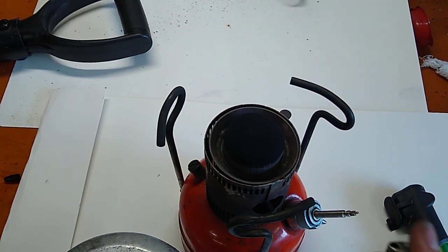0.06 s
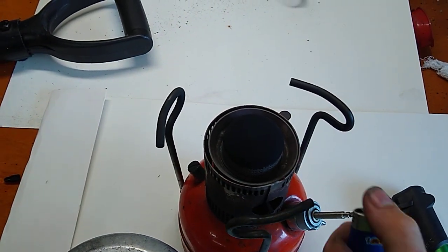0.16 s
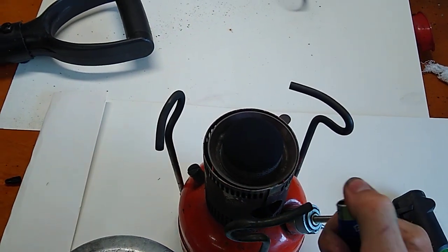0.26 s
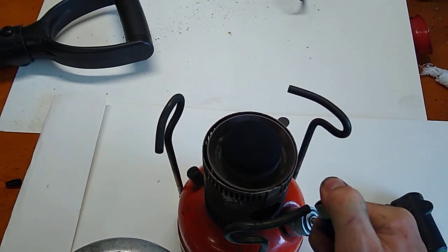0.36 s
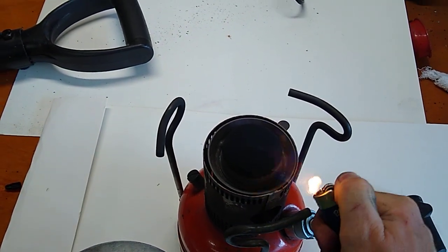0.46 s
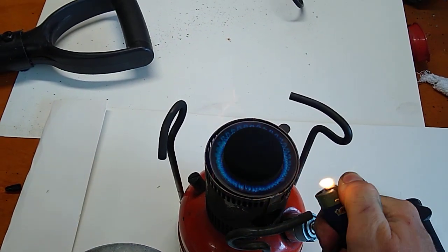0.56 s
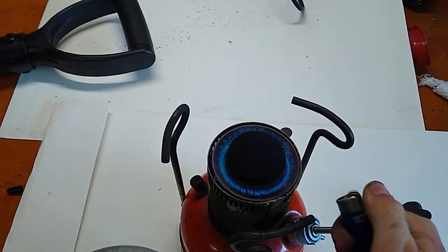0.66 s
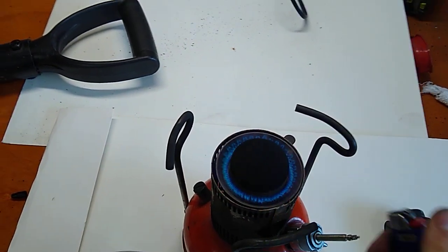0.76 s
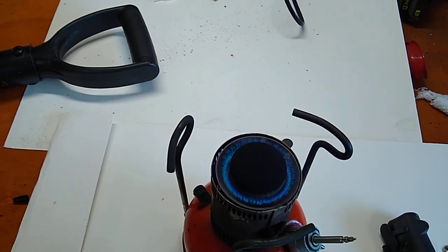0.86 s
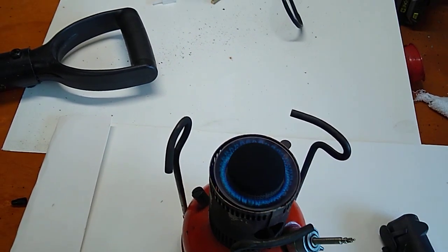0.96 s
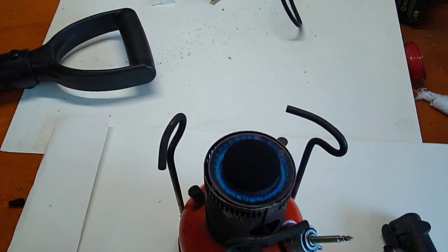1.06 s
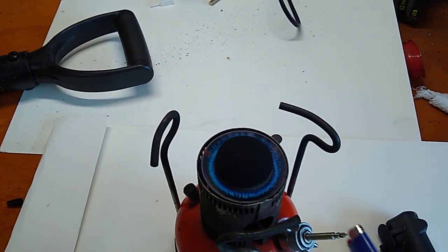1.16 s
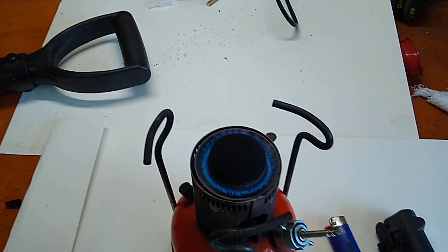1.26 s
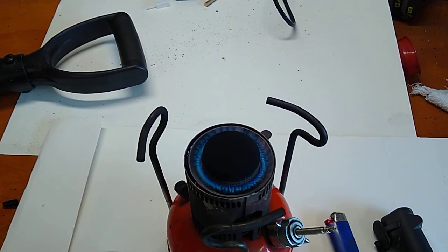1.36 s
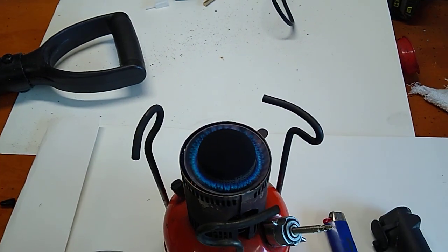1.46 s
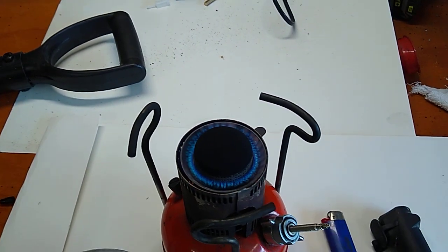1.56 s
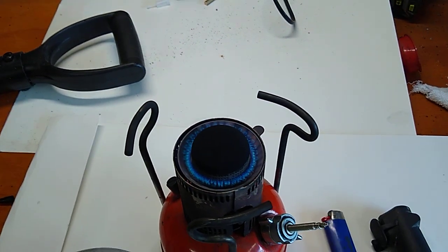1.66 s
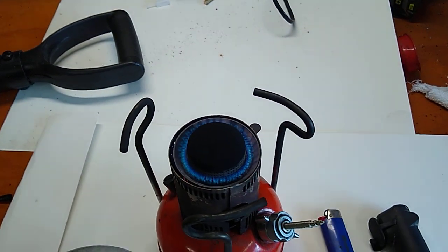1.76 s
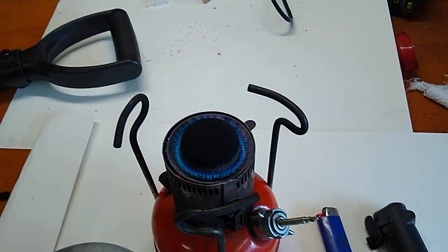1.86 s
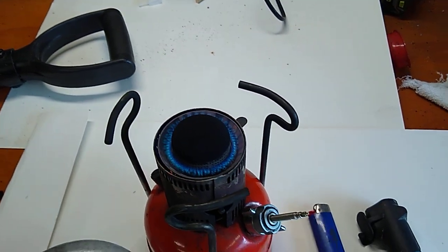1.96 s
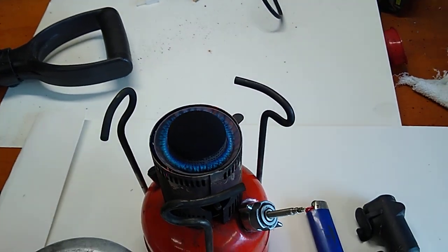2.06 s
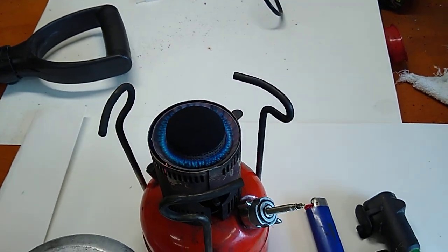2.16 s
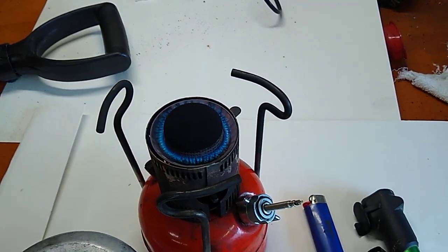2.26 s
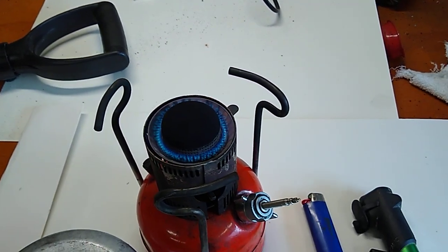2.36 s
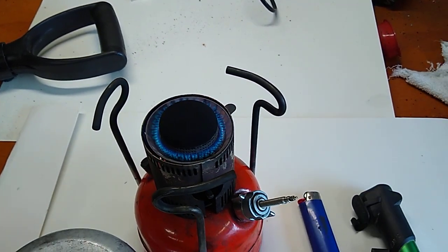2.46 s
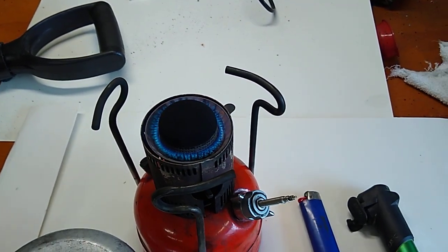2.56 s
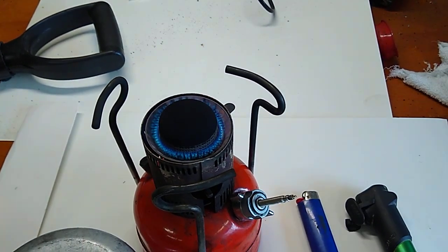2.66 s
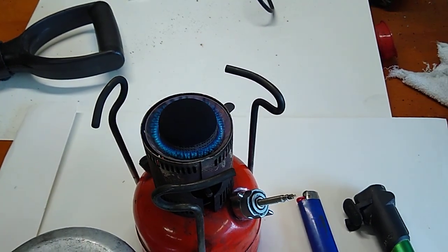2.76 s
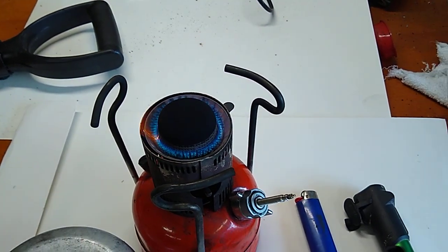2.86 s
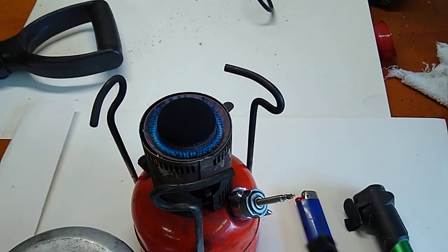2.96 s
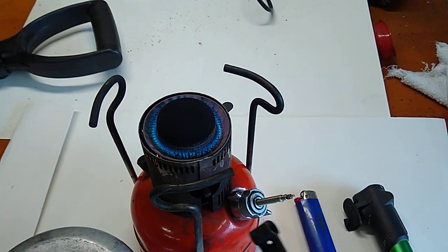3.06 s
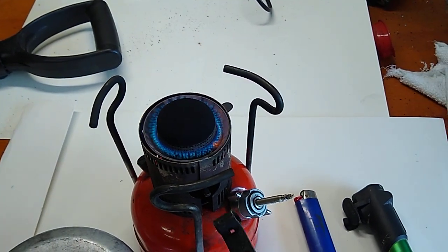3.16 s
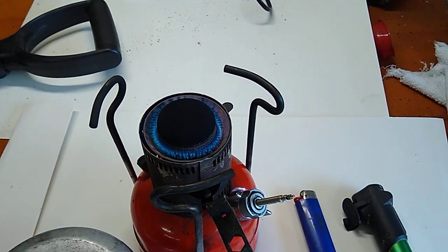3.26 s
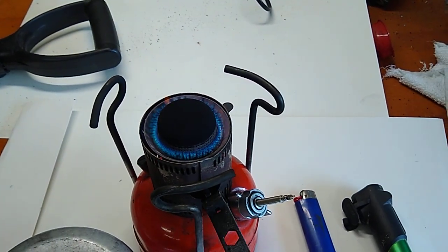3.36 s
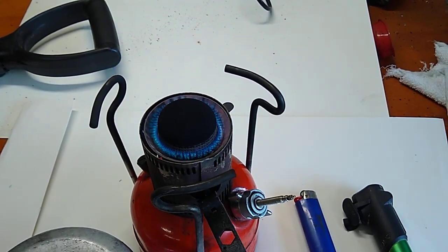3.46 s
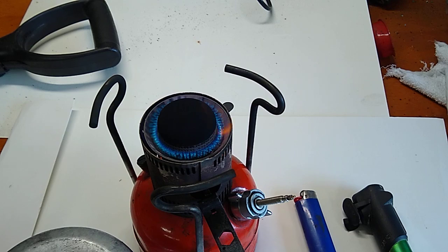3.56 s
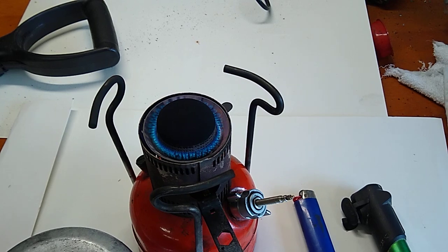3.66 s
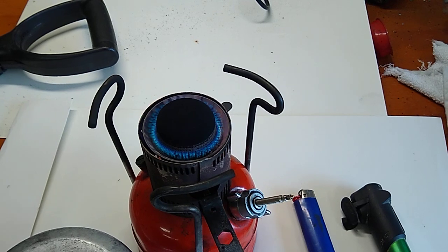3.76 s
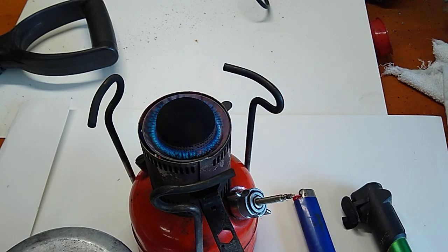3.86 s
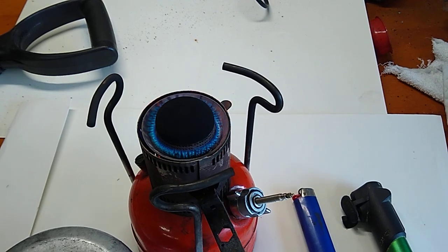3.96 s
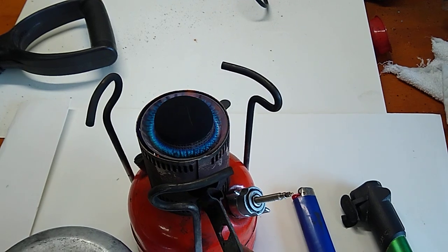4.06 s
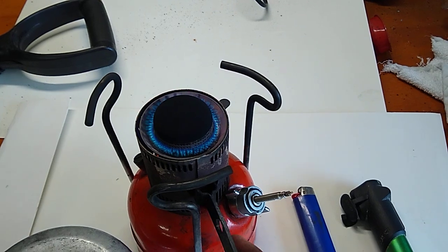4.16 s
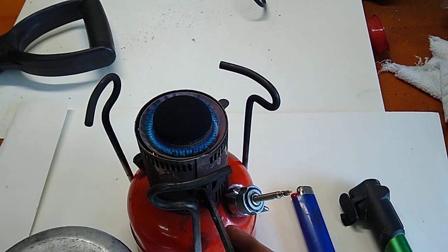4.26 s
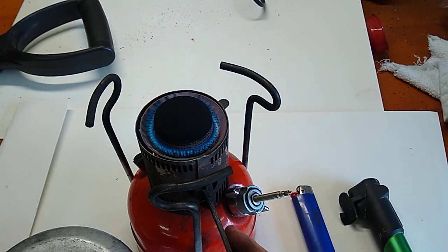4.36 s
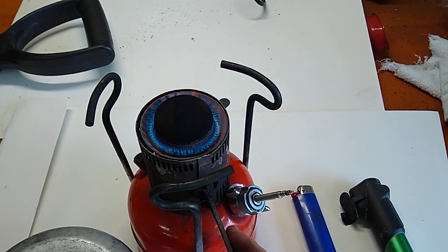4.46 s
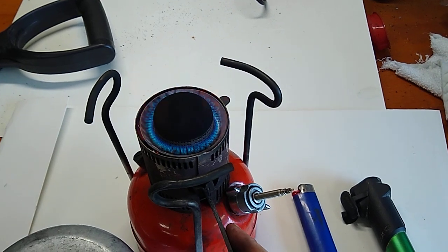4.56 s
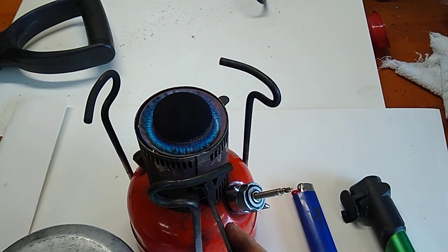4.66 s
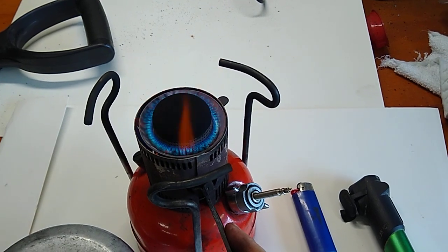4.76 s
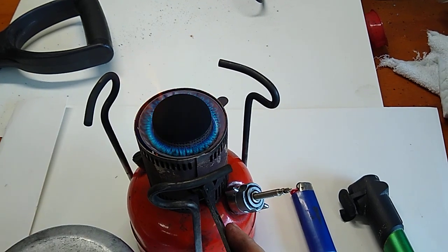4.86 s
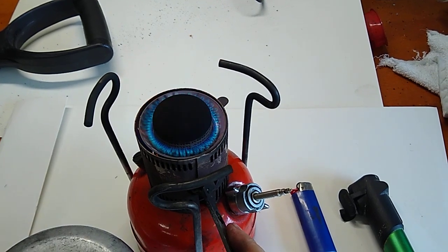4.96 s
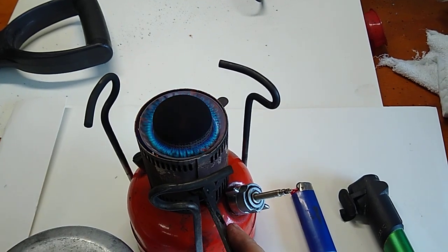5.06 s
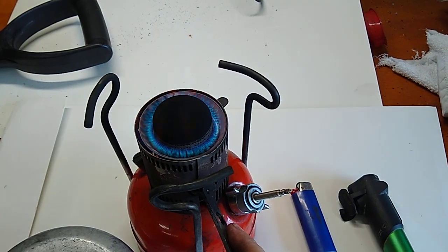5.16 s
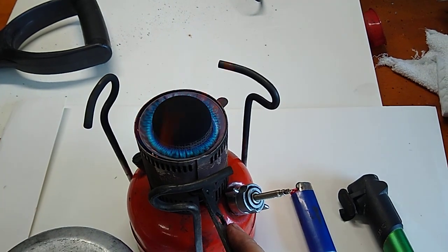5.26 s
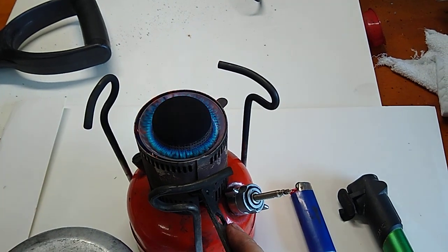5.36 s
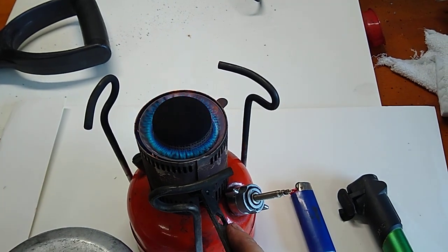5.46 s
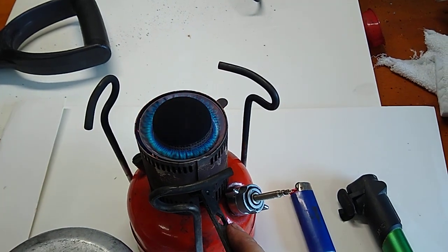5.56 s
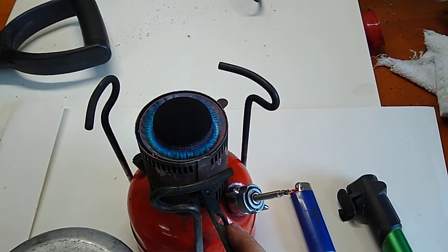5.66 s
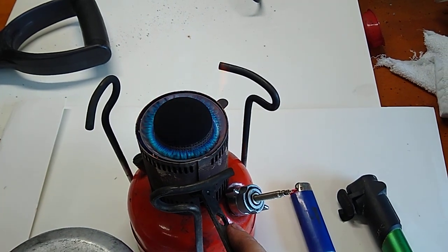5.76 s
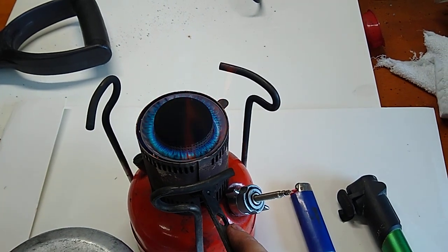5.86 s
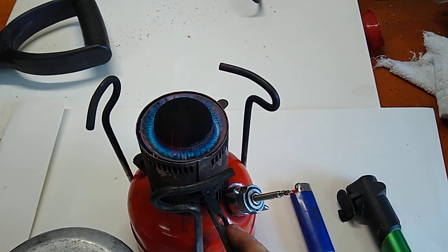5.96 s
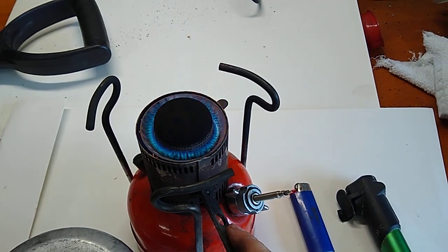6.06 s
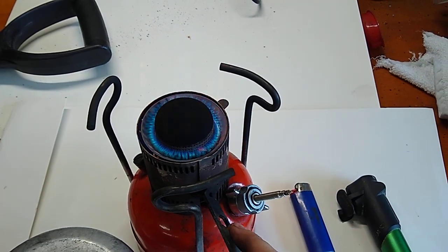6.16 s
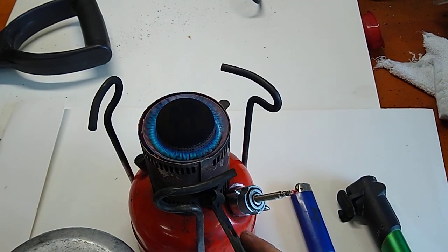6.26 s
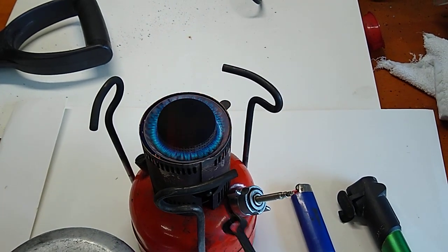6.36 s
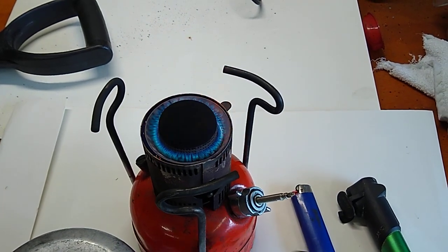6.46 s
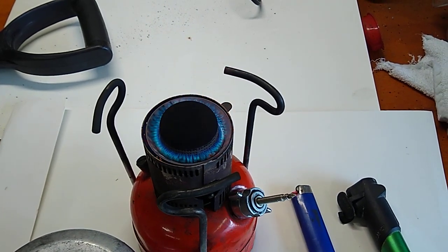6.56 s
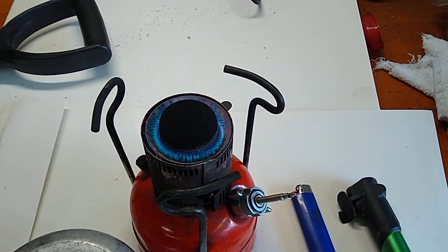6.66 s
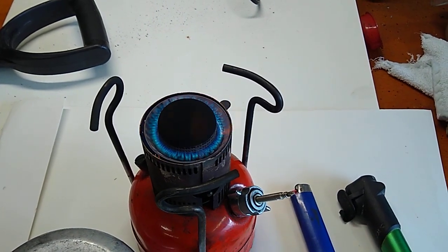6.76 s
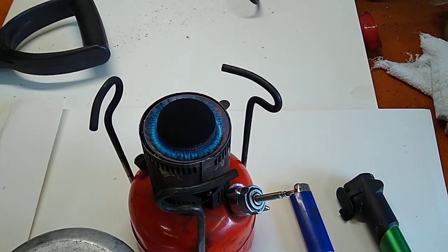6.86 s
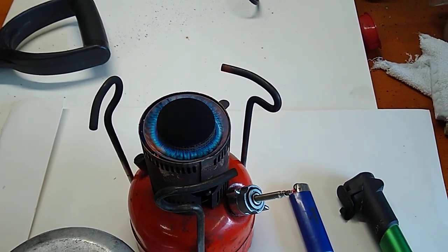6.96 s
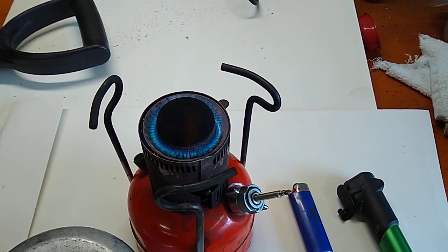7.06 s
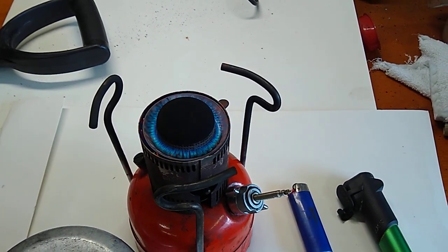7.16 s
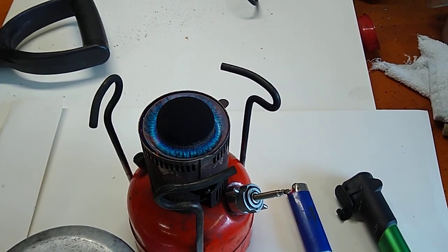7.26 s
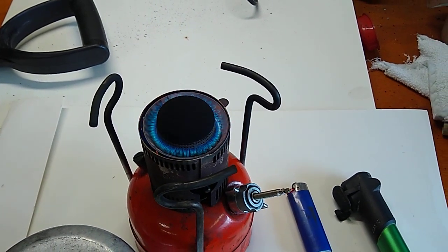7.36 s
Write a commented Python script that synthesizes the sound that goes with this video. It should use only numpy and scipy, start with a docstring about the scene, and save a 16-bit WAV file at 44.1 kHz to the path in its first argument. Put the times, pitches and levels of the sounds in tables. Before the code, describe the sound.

Close stereo sound in a small, lightly echoing workroom. From 0 s a thin, quiet vapour hiss, with a barely audible distant engine hum that climbs in pitch and fades by about 4.5 s. At 0.46 s a crisp, gritty flint snap; at 0.54 s the burner catches with a very short low woof and tiny pops, one more at 0.85 s. A soft, steady roar with airy jet hiss continues. From 1.06 to 1.24 s a lighter clacks down in a rapid cluster of hard bright clicks and woody bench knocks. Treble opens slightly as the microphones turn. Clicks at 1.93 s, knocks and ticks from 2.25 to 2.6 s, small metallic ticks at 3.83 s, a faint one at 4.3 s. Around 4.55 s the valve opens: the flame abruptly grows louder and raspier, slightly more by 5.2 s, then holds. A sharp click at 6.72 s, a strong clack and knock at 6.92 s; the roar continues to 7.4 s.

```python
"""Petrol stove lit on a workbench

Vapour hisses from the jet, a lighter is struck, the ring catches with a woof and roars; the valve is
opened later. Flame and jet are noise of set spectra, the ignition is noise bursts and gliding tones.
A lighter and a valve key click (short rings with noise) and knock (decaying bench modes).
A far engine hums upward as a few sines; a hand-held pair of microphones turns a little.
"""
import sys
import numpy as np
from scipy import signal
from scipy.fft import rfft, irfft
from scipy.io import wavfile
from scipy.ndimage import uniform_filter1d

SR = 44100
rng = np.random.default_rng(int(sys.argv[2]) if len(sys.argv) > 2 else 0)


def to_wav(s):
    """Save 16-bit WAV."""
    ch = np.atleast_2d(s).T  # columns
    pcm = np.round(np.clip(ch, -1, 1) * 32767)  # PCM
    wavfile.write(sys.argv[1], SR, pcm.astype(np.int16))


def decibels_to_gain(level_db):
    """Convert a level in decibels to a linear amplitude gain (20 dB per decade)."""
    exponent = np.asarray(level_db, float) / 20
    return 10 ** exponent


N = 326781

# Partials of the engine. Each row: order in quarters of the firing tone, level in dB.
ENGINE_ORDERS = [(2, -12), (4, 0), (6, -9)]
# Firing tone: climbs evenly after a lag that dies away.
ENGINE_HZ, ENGINE_CLIMB_HZ_PER_S, ENGINE_LAG_HZ, ENGINE_LAG_S = 77.7, 5, 12, 0.52
ENGINE_DB, ENGINE_RISE_S, ENGINE_FADE_DB_PER_S, ENGINE_GONE_S = -57.5, 0.38, 2.5, 4.3

# Room rumble spectrum. Each row: frequency in Hz, relative density in dB per Hz.
RUMBLE_SPECTRUM = [(30, -32), (65, -10), (110, -1), (140, -24), (480, -26), (900, -25), (1500, -60)]
RUMBLE_DB = -63.5
# Decay of the room. Each row: frequency in Hz, t60 in seconds.
ROOM_DECAY = [(300, 0.29), (2000, 0.29), (8000, 0.18)]
STRUCK_ROOM_DB, BURNER_ROOM_DB = -8, -13.5
# Coherence of the two microphones. Each row: frequency in Hz, left-right likeness (1 = alike).
LIKENESS = [(60, 0.95), (300, 1), (480, 0.67), (740, 0.99), (1290, 0.8), (2100, 0.35), (3400, 0.7),
            (5600, .95), (6300, .5), (7100, .8), (7800, .5), (8900, .88), (9700, .4), (11950, .8),
            (12700, .2), (15500, .6)]

# Knocks on the bench. Each row: time in seconds, level in dB, brightness in dB per octave.
KNOCKS = [(1.077, -21, 0.5), (1.084, -22, 14), (1.136, -28.5, 6), (1.232, -32, 3), (2.248, -21, 3.5),
          (2.267, -33, 3), (2.399, -23, 4.5), (2.417, -37, 3), (2.58, -31.5, -3.5), (6.9202, -16.5, 2),
          (6.947, -26, 9), (6.959, -24.5, 4)]
# Modes of the bench top. Each row: frequency in Hz, level in dB, t60 in seconds.
BENCH_MODES = [(147, -8.5, 0.19), (212, -12.5, 0.13), (254.5, -13, 0.18), (364, -5, 0.11),
               (441, -6.5, 0.059), (550, -6.5, 0.039), (626, -1, 0.03), (806, -5.5, 0.056), (858, -9, 0.12),
               (1010, 1, 0.012), (1164, -12, 0.069), (1276, -23.5, 0.088), (1510, -6.5, 0.019),
               (1800, -8.5, 0.0045), (2200, -12, 0.029)]
# Scuff of the contact. Each row: frequency in Hz, relative density in dB per Hz.
CONTACT_SPECTRUM = [(500, -44), (1200, -6), (2000, -3), (3000, 6), (5000, -20)]
CONTACT_DB, CONTACT_T60_S, RATTLE_S = -9, 0.056, 0.0098

# Hard clicks of plastic and steel. Each row: time in seconds, ring level in dB, ring pitch in Hz,
# ring t60 in seconds, crack level beside the ring in dB.
CLICKS = [(1.0623, -7.5, 5120, 0.026, -8.5), (1.075, -16, 7850, 0.0086, 0.5), (1.075, -16, 3000, 0.0098, 3),
          (1.097, -23, 2390, .012, 3), (1.089, -17, 9300, .0077, -2), (1.126, -27, 8000, .005, 1),
          (1.13, -14.5, 5100, 0.019, -9.5), (1.1385, -15.5, 9600, 0.016, -4.5),
          (1.141, -23, 3450, .012, -3), (1.2313, -3.5, 9250, 0.0046, -15.5), (1.236, -7, 7300, 0.0066, -27),
          (1.932, -16.5, 9300, .008, 0), (1.9341, -12, 9000, 0.0081, 0),
          (1.9362, -18.5, 2780, 0.0024, -0.5), (2.247, -24, 6950, 0.0055, -1),
          (2.282, -26, 6030, .0058, -11), (2.415, -11, 7800, 0.0062, -16), (2.578, -23, 7540, 0.012, -8),
          (2.621, -24, 7500, 0.0075, -10), (3.8297, -29, 3970, 0.067, 1), (3.8368, -19.5, 4700, 0.011, -10),
          (3.837, -21, 9200, 0.0087, -10), (3.8435, -26, 4850, .023, -15), (4.311, -36, 3630, .0098, 5),
          (6.7246, -11.5, 5500, 0.0087, -5), (6.858, -27, 5300, .05, -15), (6.92, -17, 7760, .008, -3),
          (6.948, -16.5, 7750, 0.016, -4), (6.9474, -14, 1860, 0.0067, 0)]
# Crack spectrum. Each row: multiple of the ring pitch, relative density in dB per Hz.
CRACK_SPECTRUM = [(.2, -30), (.45, -1), (.75, -1), (1.1, 6), (1.7, -8), (3, -11), (5, -31)]
CLICK_RISE_S, CRACK_T60_S = 0.0005, 0.015
CHATTER_DB, CHATTER_T60_S, CHATTER_PER_S = -5.5, 0.065, 1200  # loose parts after each click

# Flint and woof spectra. Each row: frequency in Hz, relative density in dB per Hz.
SPARK_SPECTRUM = [(350, -72), (600, -15), (846, -16), (4160, -3), (5710, -18), (7310, 1.5), (16000, -12)]
WOOF_SPECTRUM = [(21, -36), (35, 8.5), (328, -7.5), (505, -15), (1120, -7.5), (1690, -18), (6000, -28),
                 (7800, -73)]
# Vapour pockets that pop. Each row: start in seconds, level in dB, start Hz, end Hz, length in ms.
POPS = [(.535, -31, 69, 68, 49), (.544, -19.5, 353, 287, 15), (0.852, -30.5, 176, 105, 17.4)]
FLINT_AT_S, FLINT_DB, FLINT_HOLD_S = 0.4565, -17.5, 0.0015
FLINT_RISE_DB_PER_S, FLINT_FALL_DB_PER_S = 4000, 3500
WOOF_AT_S, WOOF_DB, WOOF_HOLD_S = 0.542, -24.5, 0.0079
WOOF_RISE_DB_PER_S, WOOF_FALL_DB_PER_S = 1500, 1800

# Lit flame, unlit vapour in the burner cap, jet. Each row: frequency in Hz, relative density in dB per Hz.
ROAR_SPECTRUM = [(35, -40), (70, -35), (100, 8), (160, -14.5), (260, 3.5), (400, -4.5), (660, 0.5),
                 (1000, 0.5), (1700, -3.5), (2500, -14.5), (3500, -55)]
RASP_SPECTRUM = [(500, -11.5), (800, -6.5), (950, -5), (1300, -11.5), (1650, -3), (2100, -4), (2560, -3),
                 (3000, -12.5), (3500, -11), (4400, -14), (5500, -53)]
COLD_SPECTRUM = [(290, -74), (500, -57), (1200, -13), (1510, -6), (1760, -15), (2000, -10.5), (3140, -22.5),
                 (4500, -12), (5850, -12.5), (9900, -51)]
HISS_SPECTRUM = [(2500, -21.5), (3500, -19), (6500, -15.5), (8200, -10.5), (10200, -18.5), (11000, -13.5),
                 (11500, -22), (12700, -40), (14500, -13), (16500, -28)]
# Resonances of the jet tube, and its whistle. Each row: frequency in Hz, width in Hz, relative peak in dB.
TUBE_MODES = [(5023, 830, -1.5), (7154, 310, -4), (11950, 400, -10), (13520, 420, -9.5), (15450, 650, -12)]
WHISTLE_MODES = [(8954, 970, 0)]
# Bench and wall echoes colour the flame. Each row: frequency in Hz, width in Hz, gain in dB.
ECHO_DIPS = [(172, 13, -26), (501, 59, -18), (747, 25, -19), (2180, 47, -5.5), (2398, 170, -7),
             (2610, 120, 3), (2714, 100, -4.5)]
# Fuel valve. Each row: time in seconds, opening 0-1.
VALVE = [(0, 0.06), (4.52, 0.02), (4.62, 0.76), (4.8, 0.79), (5.2, 0.98), (7.41, 0.97)]
# Roar, rasp, hiss. Each row: level with valve at 0 in dB, gain with valve at 1 in dB,
# change at the middle of the settling in dB.
LAYERS = [(-41, 2, 0.5), (-47.5, 12, -2.5), (-45, 5, -3.5)]
# Jet whistle. Each row: time in seconds, level in dB.
WHISTLE_LEVEL = [(0, -49), (.5, -44.5), (.6, -35.5), (.74, -44.5), (1.0, -37.5), (1.8, -44.5), (2.4, -53),
                 (3.3, -46.5), (4.5, -48), (4.61, -42.5), (6.2, -37.5), (7.41, -38)]
COLD_DB, CATCH_S = -42, 0.53  # unlit vapour, moment the ring catches
SETTLE_AT_S, SETTLE_S = 0.77, 0.14  # cold flame settles
OPEN_TOP_DB = -7  # top treble grows less than the rest as the valve opens

# Stereo of the stove. Each row: frequency in Hz, left minus right in dB.
LEAN = [(60, 3), (200, -2.0), (380, -1.5), (700, -5), (1290, -7), (2380, -6.5), (4400, -4), (9000, 1),
        (10600, -4), (11500, -19), (12800, -16), (13700, -3), (14400, -2), (15500, -6)]
# Each row: frequency in Hz, left lead in radians.
LEAD = [(0, 0), (7300, -.2), (8200, -1.4), (9300, -1), (9800, -3), (11000, -3), (12000, -1.1),
        (13300, -1.2), (14000, -2.2), (16300, -1.7)]
# Microphones turn to face the stove; before that the left leads more and treble is lost, more on the left.
TURN_LEAD_US, TURN_AT_S, TURN_S = 100, 1.25, 0.41
AWAY_DB, AWAY_HZ, AWAY_LEAN_DB = -9, 9000, -7.5
# Left port for struck sounds: lead, then where and how long the housing scatters treble, where it shades it.
LEFT_LEAD_MS, SCATTER_HZ, SCATTER_MS, SHADE_HZ = 0.16, 6200, 0.7, 9000
MIC_LOW_HZ, MIC_TOP_HZ = 62, 15750


def evened(x):
    """Scales to rms 1."""
    return x / np.sqrt(np.mean(abs(x) ** 2) + 1e-20)


def read(points, hz):
    """Interpolates a table at hz, straight on a log frequency axis."""
    f, value = np.transpose(points)
    return np.interp(np.log(hz + 1), np.log(f + 1), value)


def density(points, hz):
    """Power spectrum of a table in dB."""
    return decibels_to_gain(read(points, hz)) ** 2


def unit(power):
    """Spectrum scaled to sum 1, as a column."""
    return (power / power.sum())[:, None]


def add(mix, s, sound):
    """Adds a sound into the mix at time s."""
    part = mix[..., round(s * SR):][..., :sound.shape[-1]]
    part += sound[..., :part.shape[-1]]


def filtered(x, order, hz, kind):
    """Butterworth filter."""
    return signal.sosfilt(signal.butter(order, hz, kind, fs=SR, output="sos"), x)


def humps(modes, hz):
    """Power of resonances with steep skirts."""
    return sum(decibels_to_gain(db) ** 2 / (1 + (2 * (hz - f) / width) ** 2) ** 2 for f, width, db in modes)


def burst(points, envelope):
    """Noise of a given spectrum under an envelope."""
    z = rfft(rng.standard_normal(4096)) * decibels_to_gain(read(points, np.fft.rfftfreq(4096, 1 / SR)))
    return evened(irfft(z))[:len(envelope)] * envelope


def flash(at_s, db, rise_db_per_s, hold_s, fall_db_per_s, lead_s=0.036):
    """Start time and gain of a steep rise, a short hold and a steep fall."""
    t = np.arange(4096) / SR - lead_s
    level_db = db + rise_db_per_s * np.minimum(t, 0) - fall_db_per_s * np.maximum(t - hold_s, 0)
    return at_s - lead_s, decibels_to_gain(level_db)


def ports(x, right_db, left_low_db, left_high_db):
    """Two microphone ports: the left hears a little early, its treble scattered and shaded by the housing."""
    low = filtered(x, 2, SCATTER_HZ, "lowpass")
    high = filtered(x, 2, [SCATTER_HZ, SHADE_HZ], "bandpass")
    taps = rng.standard_normal(150) * np.exp(-np.arange(150) / SR * 1000 / SCATTER_MS)
    scattered = signal.oaconvolve(high, taps / np.linalg.norm(taps))[:N]
    left = decibels_to_gain(left_low_db) * low + decibels_to_gain(left_high_db) * scattered
    lead = round(LEFT_LEAD_MS * SR / 1000) + 2  # 2 samples undo the filter lag
    return np.array([np.roll(left, -lead), decibels_to_gain(right_db) * x])


def engine():
    """A low firing tone and its neighbours climb with the engine speed."""
    t = np.arange(N) / SR
    hz = ENGINE_HZ + ENGINE_CLIMB_HZ_PER_S * t - ENGINE_LAG_HZ * np.exp(-(t / ENGINE_LAG_S) ** 2)
    quarters = np.cumsum(hz) / SR / 4
    tone = sum(decibels_to_gain(db) * np.sin(2 * np.pi * (k * quarters + rng.random())) for k, db in ENGINE_ORDERS)
    level_db = ENGINE_DB - ENGINE_FADE_DB_PER_S * t - 35 * np.clip(t - ENGINE_GONE_S, 0, 2)
    return np.sqrt(2) * tone * decibels_to_gain(level_db) * np.minimum(t / ENGINE_RISE_S + 0.15, 1)


def room(x):
    """Sparse echoes of random sign, each band dying at its own speed."""
    taps = np.zeros((2, SR // 2))
    at = np.arange(120, SR // 2 - 20, 20) + rng.integers(0, 20, (2, (SR // 2 - 121) // 20))
    np.put_along_axis(taps, at, rng.choice([-1., 1.], at.shape), 1)
    hz, t, z = signal.stft(taps, SR, nperseg=256)
    same = np.clip(read(LIKENESS, hz), 0, 1)[:, None]  # long waves reach both microphones alike
    z[0] = same * z[1] + np.sqrt(1 - same ** 2) * z[0]
    decay = decibels_to_gain(-60 * t / read(ROOM_DECAY, hz)[:, None])
    tail = signal.istft(z * decay, SR, nperseg=256)[1]
    return signal.oaconvolve(x, tail / np.linalg.norm(tail[0]), axes=1)[:, :N]


def knocks(rattle=0.14):
    """A sharp blow and the rattle that follows drive the modes of the bench top."""
    out, t = np.zeros(N), np.arange(12000) / SR
    for s, db, tilt_db in KNOCKS:
        body = np.zeros(len(t))
        for k, (hz, mode_db, t60) in enumerate(BENCH_MODES):
            level_db = mode_db + tilt_db * np.log2(hz / 500) - 60 * t / t60
            body += (-1) ** k * decibels_to_gain(level_db) * np.sin(2 * np.pi * hz * t)
        blow = rattle * rng.standard_normal(1500) * np.exp(-t[:1500] / RATTLE_S) / np.sqrt(10)
        blow[0] = 1
        knock = signal.fftconvolve(body, blow)
        add(out, s, decibels_to_gain(db) * knock / (1.32 * np.sqrt(np.mean(knock[:900] ** 2))))
        add(out, s, burst(CONTACT_SPECTRUM, decibels_to_gain(db + CONTACT_DB - 60 * t[:4000] / CONTACT_T60_S)))
    out = filtered(out, 6, 125, "highpass")  # the knocks carry no deep bass
    return ports(out, 1.5, -1.3, -1.7)


def chatter(t, grain_samples=40):
    """A grainy envelope of tiny random taps that dies away."""
    taps = (rng.random(len(t)) < CHATTER_PER_S / SR) * rng.exponential(1, len(t))
    grains = evened(signal.lfilter([1], [1, -np.exp(-1 / grain_samples)], taps))
    return grains * decibels_to_gain(CHATTER_DB - 60 * t / CHATTER_T60_S)


def clicks():
    """One short ring each, and a broad crack around its pitch."""
    out, t = np.zeros(N), np.arange(4000) / SR
    rise = np.minimum(t / CLICK_RISE_S, 1)
    for s, db, hz, ring_t60, crack_db in CLICKS:
        ring = np.sin(2 * np.pi * hz * t) * decibels_to_gain(-60 * t / ring_t60)
        envelope = decibels_to_gain(crack_db) * (decibels_to_gain(-60 * t / CRACK_T60_S) + chatter(t))
        crack = burst([(hz * k, k_db) for k, k_db in CRACK_SPECTRUM], envelope)
        add(out, s, decibels_to_gain(db) * rise * (ring + crack))
    return ports(out, 3.7, -3.6, -0.68)


def ignition():
    """The flint sprays grit, the vapour cloud catches, pockets pop with a falling pitch."""
    out = np.zeros(N)
    flint = flash(FLINT_AT_S, FLINT_DB, FLINT_RISE_DB_PER_S, FLINT_HOLD_S, FLINT_FALL_DB_PER_S)
    woof = flash(WOOF_AT_S, WOOF_DB, WOOF_RISE_DB_PER_S, WOOF_HOLD_S, WOOF_FALL_DB_PER_S)
    for (s, envelope), spectrum in ((flint, SPARK_SPECTRUM), (woof, WOOF_SPECTRUM)):
        add(out, s, burst(spectrum, envelope))
    for s, db, start_hz, end_hz, length_ms in POPS:
        hz = np.linspace(start_hz, end_hz, round(length_ms * SR / 1000))
        add(out, s, decibels_to_gain(db) * np.hanning(len(hz)) * np.sin(2 * np.pi * np.cumsum(hz) / SR))
    return ports(out, 4.3, -0.76, 0)


def stove_power(t, hz, away, top, patchy_db=0.5, flutter_db=0.76):
    """Turbulence: roar, rasp, jet noise and room rumble add as powers (frequency by time)."""
    valve = np.interp(t, *np.transpose(VALVE))
    settling = np.exp(-((t - SETTLE_AT_S) / SETTLE_S) ** 2)
    roar, rasp, hiss = (decibels_to_gain(low_db + open_db * valve + settle_db * settling) ** 2
                        for low_db, open_db, settle_db in LAYERS)
    waver = evened(uniform_filter1d(rng.standard_normal(len(t)), 30))
    whistle = decibels_to_gain(np.interp(t, *np.transpose(WHISTLE_LEVEL)) + 0.57 * waver) ** 2
    lit = np.clip((t - CATCH_S) / 0.05, 0, 1)
    echo_db = sum(db / (1 + (2 * (hz - f) / width) ** 2) for f, width, db in ECHO_DIPS)
    flame = (unit(density(ROAR_SPECTRUM, hz)) * roar + unit(density(RASP_SPECTRUM, hz)) * rasp) * lit
    power = decibels_to_gain(echo_db)[:, None] ** 2 * flame
    power += unit(density(COLD_SPECTRUM, hz)) * decibels_to_gain(COLD_DB) ** 2 * (1 - lit)
    power += unit(density(HISS_SPECTRUM, hz) + humps(TUBE_MODES, hz)) * hiss
    power += unit(humps(WHISTLE_MODES, hz)) * whistle
    open_top_db = OPEN_TOP_DB * valve * np.clip(hz[:, None] / AWAY_HZ - 1, 0, 1)
    power *= decibels_to_gain(AWAY_DB * top * away + open_top_db) ** 2
    patches = rng.standard_normal((len(hz), len(t)))
    patches = evened(uniform_filter1d(uniform_filter1d(patches, 10, 0), 10, 1))
    flutter = evened(uniform_filter1d(rng.standard_normal(len(t)), 6))  # the level wavers as a whole
    power *= decibels_to_gain(patchy_db * patches + flutter_db * flutter) ** 2
    return power + unit(density(RUMBLE_SPECTRUM, hz)) * decibels_to_gain(RUMBLE_DB) ** 2


def stove():
    """Random phases under the stove's power reach two partly coherent microphones."""
    t, hz = np.arange(N // 256 + 5) * 256 / SR, np.fft.rfftfreq(1024, 1 / SR)
    away = 1 / (1 + np.exp((t - TURN_AT_S) / TURN_S))
    top = 1 / (1 + (AWAY_HZ / (hz[:, None] + 1)) ** 8)
    power = stove_power(t, hz, away, top)
    a, b, c, d = rng.standard_normal((4, len(hz), len(t)))
    right, other = a + 1j * b, c + 1j * d
    same = np.clip(read(LIKENESS, hz), -1, 1)[:, None]
    lead = read(LEAD, hz)[:, None] + 2 * np.pi * hz[:, None] * TURN_LEAD_US / 10 ** 6 * away
    left = (same * right + np.sqrt(1 - same ** 2) * other) * np.exp(1j * lead)
    lean = decibels_to_gain((read(LEAN, hz)[:, None] + AWAY_LEAN_DB * top * away) / 2)  # half on each side
    z = np.array([left * lean, right / lean]) * np.sqrt(power)
    return signal.istft(z, nperseg=1024, noverlap=768)[1][:, :N] * np.sqrt(2)


def scene():
    """Burner and struck sounds ring in the room, over the far hum."""
    struck, burner = ignition() + clicks() + knocks(), stove()
    upper_burner = filtered(burner, 2, 700, "highpass")  # only the burner's upper band feeds the echoes
    echoes = room(decibels_to_gain(STRUCK_ROOM_DB) * struck + decibels_to_gain(BURNER_ROOM_DB) * upper_burner)
    return burner + engine() + struck + echoes


def roll_off(x):
    """The treble ends steeply here."""
    return signal.sosfilt(signal.butter(12, 16680, fs=SR, output="sos"), x)


def record(dry):
    """Microphone band limits: gentle below, steep above."""
    thin = filtered(dry, 4, MIC_LOW_HZ, "highpass")
    dull = signal.sosfilt(signal.ellip(8, 0.5, 40, MIC_TOP_HZ, fs=SR, output="sos"), thin)
    return roll_off(dull)


dry = scene()
out = record(dry)
to_wav(out)
```